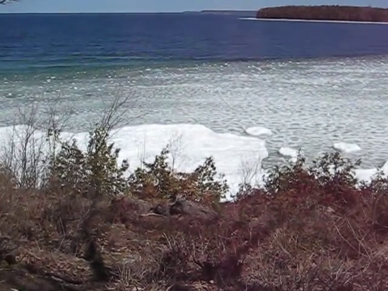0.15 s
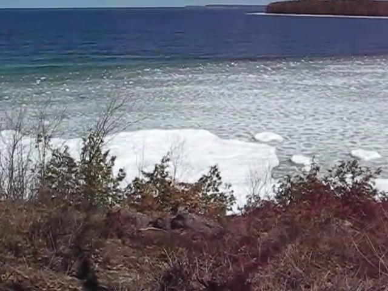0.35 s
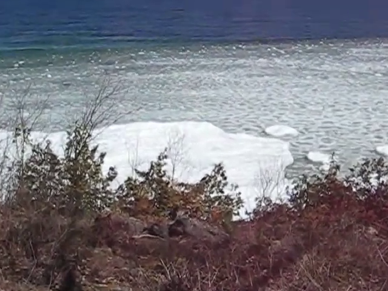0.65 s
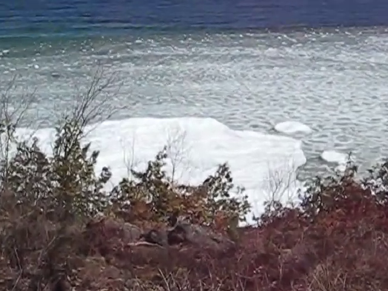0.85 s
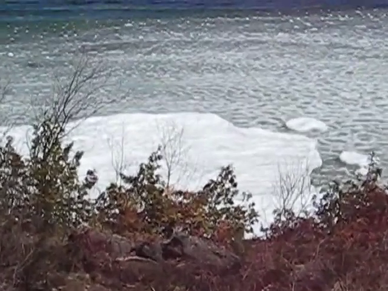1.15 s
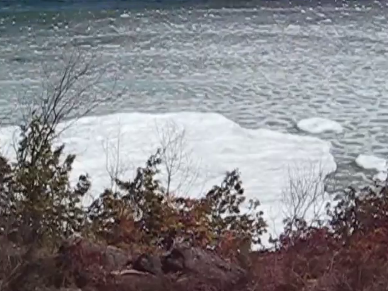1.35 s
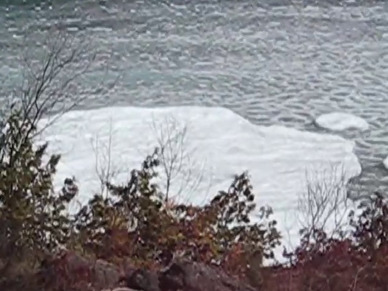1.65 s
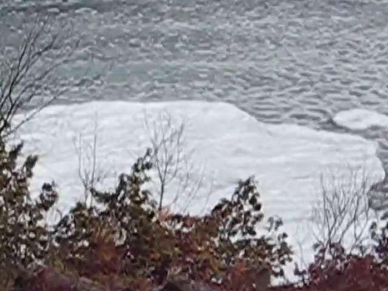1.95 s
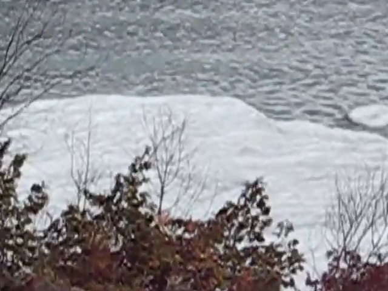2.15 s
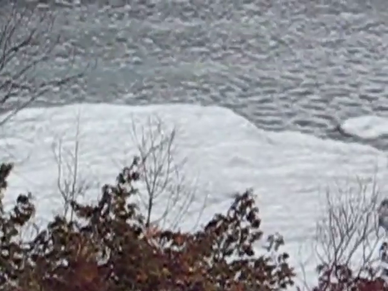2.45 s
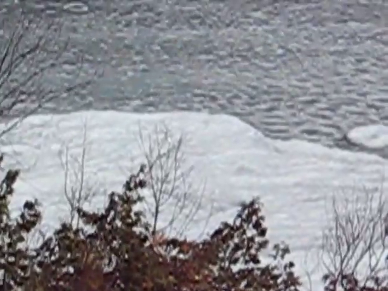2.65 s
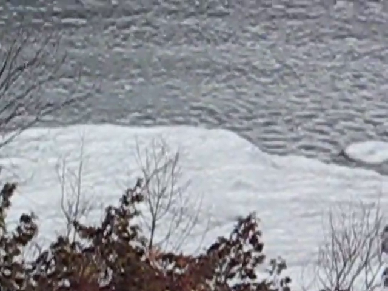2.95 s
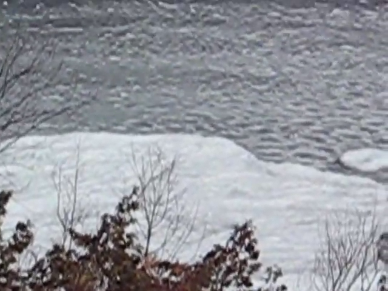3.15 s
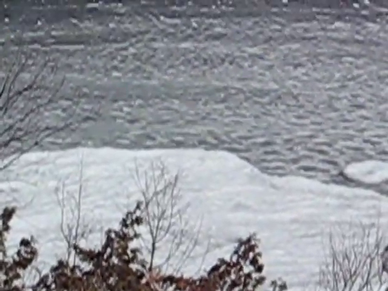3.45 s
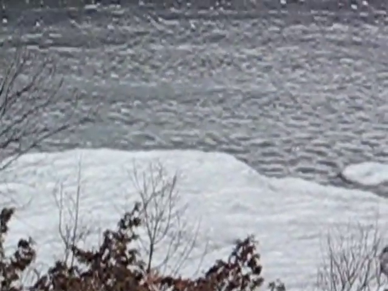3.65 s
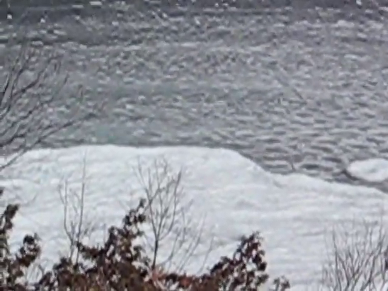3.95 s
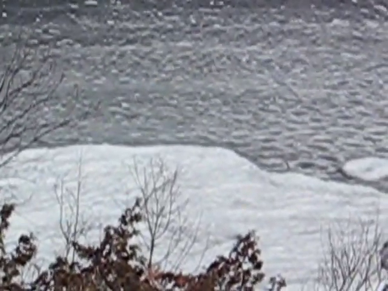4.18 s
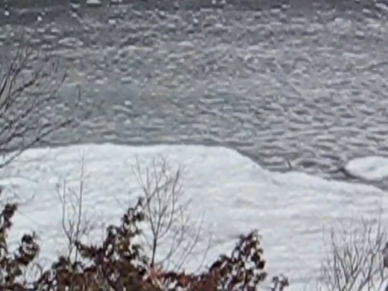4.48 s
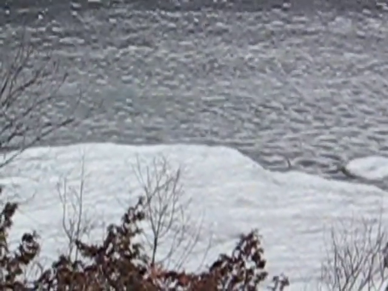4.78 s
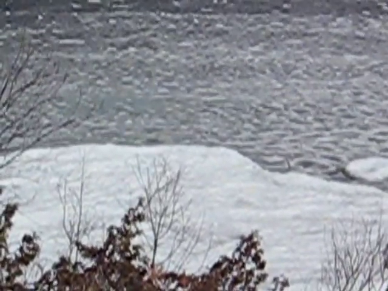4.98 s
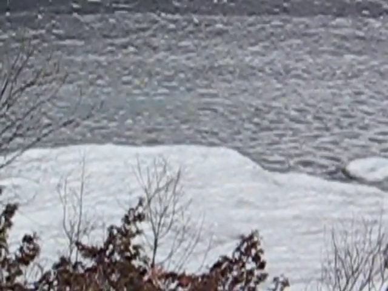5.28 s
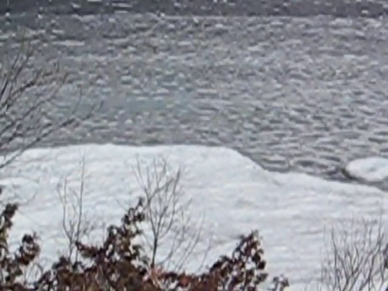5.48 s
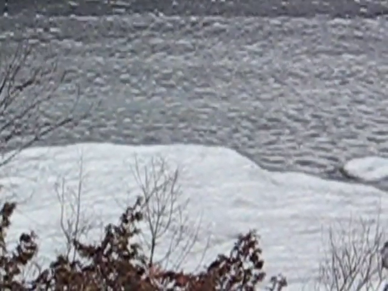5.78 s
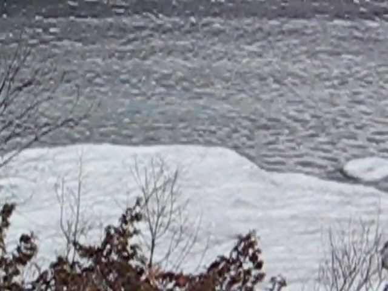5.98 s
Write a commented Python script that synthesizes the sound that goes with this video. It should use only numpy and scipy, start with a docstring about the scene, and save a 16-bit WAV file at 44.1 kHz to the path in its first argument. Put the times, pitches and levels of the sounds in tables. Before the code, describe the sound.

Lake water washes through slush and floating ice throughout the six seconds, heard from the bank above as a dense, bright, slightly fluttering hiss. Faint ticks of nearer ice pieces blend into it. A wave builds from the start, is fullest between about 1 and 1.8 seconds with a soft slosh and fizz, and drains away by about 3 seconds, leaving a calmer, steady wash.

Right at the microphone, the hand-held camera gives one short, sharp plastic click at about 1.9 seconds. A brief dull handling knock follows at 2.4 seconds, the strongest of the knocks, then two softer ones close together at around 3.1 seconds. Very faint puffs of air bump the microphone near 0.45 and 4.8 seconds, and a barely audible low air rumble rises around 4.2 seconds. The icy hiss continues to the end.

```python
"""A lake shore, heard from the bank above: water washes through slush and floating ice.
Countless small ice pieces merge into one hiss; a wave swells in it for two seconds and drains away,
while nearer bits tick against each other. Right at the microphone, light air rumbles and puffs,
and the hand-held camera knocks softly a few times and clicks once."""
import sys
import numpy as np
from scipy import signal
from scipy.io import wavfile
from scipy.ndimage import uniform_filter1d

SR = 44100
rng = np.random.default_rng(int(sys.argv[2]) if len(sys.argv) > 2 else 0)


def dump_mix(stems):
    """Bounce the given channels to the path in sys.argv[1] as a 16-bit WAV at rate SR."""
    frames = np.atleast_2d(stems).T  # one column per channel
    limited = np.clip(frames, -1, 1)  # hard clip at full scale
    pcm = np.round(limited * 32767).astype(np.int16)
    wavfile.write(sys.argv[1], SR, pcm)


N = 269892


def gain_of(db):
    """Decibels to gain."""
    return 10 ** (np.asarray(db) / 20)


def unit_rms(x):
    """Scales to rms 1."""
    return x / np.sqrt(np.mean(x ** 2) + 1e-20)


def unit_peak(x):
    """Scales to peak 1."""
    return x / (abs(x).max() + 1e-20)


def lowpass(x, hz, order=2):
    """Dulls a sound above hz."""
    return signal.sosfilt(signal.butter(order, hz, fs=SR, output="sos"), x)


def bump(distance):
    """A smooth hill of height 1 and half width 1."""
    return np.exp(-distance ** 2)


def curve_at(points, hz, column=1):
    """Reads one column of a spectrum on a log-frequency axis."""
    table = np.array(points, float)
    return np.interp(np.log(hz + 1), np.log(table[:, 0] + 1), table[:, column])


def add(mix, s, sound):
    """Adds a sound at time s."""
    part = mix[round(s * SR):][:len(sound)]
    part += sound[:len(part)]


def patches(shape, size):
    """Smooth random relief, size = (frames, bins) across."""
    smooth_in_time = uniform_filter1d(rng.standard_normal(shape), size[0], 0)
    return unit_rms(uniform_filter1d(smooth_in_time, size[1], 1))


def swell(t, crest_s, lift_db, build_s, drain_s, ebb_db_per_s, calm_s=5.5):
    """Level of one voice above calm water, in dB: the wave builds and drains over a slow ebb."""
    width_s = np.where(t < crest_s, build_s, drain_s)
    return lift_db * bump((t - crest_s) / width_s) + ebb_db_per_s * (calm_s - t)


# One wave below the bank, in three voices: crest t/s, lift/dB, build/s, drain/s, ebb/(dB/s)
WATER_SLOSH = (1.07, 6.74, 1.5, 1.14, 0.91)
SLUSH_RUSH = (1.7, 5.44, 1.26, 0.59, 0.83)
FINE_ICE_FIZZ = (1.26, 4.86, 0.83, 0.97, 0.5)
# How far each pitch follows those voices: f/Hz, slosh share, rush share, fizz share
VOICE_SHARES = [(333, 0.052, 0.056, 0), (525, 1, 0.028, 0), (1220, 0.93, 0.091, 0.11), (1950, 0.034, 1, 0),
                (3000, 0, 0.98, 0.067), (4620, 0.014, 0.099, 0.78), (6000, 0.03, 0, 0.96),
                (8160, 0, 0.046, 1.25), (9600, 0, 0, 0.64), (12500, 0, 0, 0.63), (15500, 0, 0, .25)]
# The hiss of the calm shore, from the bank: f/Hz, relative level/dB
CALM_SPECTRUM = [(20, -29), (60, -21.5), (130, -18.5), (250, -14), (400, -13.5), (650, -9.5), (920, -5.5),
                 (1350, -5), (2200, -0.5), (3500, 0), (6300, -4.5), (9300, -18), (12000, -21.5),
                 (15500, -32.5)]
# Wavelets breaking on the wave and in its wake: t/s, half length/s, lift/dB, f/Hz
BREAKING_WAVELETS = [(0.22, 0.09, 2, 1800), (0.58, 0.1, 1.5, 2000), (0.84, 0.1, 1, 6200),
                     (1.098, 0.16, 1.6, 2000), (1.35, 0.084, 1.7, 8000), (1.56, 0.07, 2, 7500),
                     (1.73, 0.074, 1.5, 2600), (2.2, 0.16, 1.0, 8000), (3.33, 0.3, 1.5, 900),
                     (3.42, 0.35, 0.6, 5500)]
# Broad resonances and hollows in the hiss: f/Hz, half width/Hz, calm level/dB, crest level/dB
HISS_RESONANCES = [(395, 43, -1.3, -3), (710, 85, -1, -0.2), (920, 69, 1, -0.2), (1420, 180, -0.3, 0),
                   (2090, 180, 1.5, 2), (2460, 310, -0.1, -0.5), (3120, 150, 0.5, 1.4),
                   (3600, 130, 0.5, -2), (4590, 290, 1, -1.2), (5760, 560, 0, 0.6)]


def shore_wash(level_db=-24.5, ripple_db=(0.4, 0.33, 0.2)):
    """Far off, ice grains too dense to tell apart merge into a hiss that the wave lifts."""
    t = np.arange(N // 256 + 5) * 256 / SR
    hz = np.fft.rfftfreq(1024, 1 / SR)
    shape = (len(t), len(hz))
    rise_db = np.transpose([swell(t, *voice) for voice in (WATER_SLOSH, SLUSH_RUSH, FINE_ICE_FIZZ)])
    ripples_db = np.array(ripple_db) * patches(rise_db.shape, size=(20, 1))
    shares = [curve_at(VOICE_SHARES, hz, column) for column in (1, 2, 3)]
    field_db = curve_at(CALM_SPECTRUM, hz) + (rise_db + ripples_db) @ shares
    for s, half_s, db, f in BREAKING_WAVELETS:
        octaves_away = np.log2((hz + 1) / f)
        field_db += db * np.outer(bump((t - s) / half_s), bump(octaves_away))
    # the colour shifts as the wave crests
    crest = unit_peak(rise_db.mean(1))[:, None]
    for f, width, calm_db, crest_db in HISS_RESONANCES:
        field_db += (calm_db + crest * (crest_db - calm_db)) * bump((hz - f) / width)
    field_db += 0.32 * patches(shape, size=(14, 16))  # clumps of slush shift on their own
    field_db += 0.58 * patches(shape, size=(10, 5)) / (1 + (hz / 2500) ** 2)  # low lapping
    field_db += 0.14 * patches((len(t), 1), size=(7, 1))  # the whole hiss flutters
    noise = rng.standard_normal(shape) + 1j * rng.standard_normal(shape)
    hiss = signal.istft((noise * gain_of(field_db)).T, nperseg=1024, noverlap=768)[1][:N]
    return gain_of(level_db) * unit_rms(hiss)


def ice_ticks(calm_db=-47.0, per_s=700, spread_db=6.0, cycles=7, pitches=24):
    """Nearer the microphone, bits of ice tick against each other, louder as the slush rushes."""
    t, out = np.arange(900) / SR, np.zeros(N)
    strength = gain_of(spread_db * np.minimum(rng.exponential(1, N), 4))
    impacts = strength * (rng.random(N) < per_s / SR)
    piece = rng.integers(0, pitches, N)
    for k, hz in enumerate(np.geomspace(1500, 6500, pitches)):
        age = t * hz / cycles
        tick = age * np.exp(-3 * age) * np.sin(2 * np.pi * hz * t)
        out += signal.oaconvolve(impacts * (piece == k), tick)[:N]
    return gain_of(calm_db + swell(np.arange(N) / SR, *SLUSH_RUSH)) * unit_rms(out)


# Light gusts across the microphone: t/s, half length/s, lift/dB
MIC_GUSTS = [(3.6, 0.35, 5), (4.22, 0.22, 10), (4.87, 0.07, 8)]


def air_rumble(steady_db=-69, cutoff_hz=50):
    """Air moving over the microphone makes a faint rumble that rises with each gust."""
    t = np.arange(N) / SR
    gust_db = sum(db * bump((t - s) / half_s) for s, half_s, db in MIC_GUSTS)
    rumble = unit_rms(lowpass(rng.standard_normal(N), cutoff_hz))
    return gain_of(steady_db + gust_db) * rumble


# The hand on the camera, right at the microphone: t/s, peak level/dB, low-pass f/Hz
HAND_KNOCKS = [(0.3533, -30, 420), (1.8905, -32, 350), (1.9254, -22.5, 553), (2.3728, -9, 900),
               (3.0549, -14, 730), (3.1384, -23, 620)]
# Modes of the camera's case: f/Hz, relative level/dB, time to fall 60 dB/s
CASE_MODES = [(267, -8, 0.019), (420, 1.5, 0.016), (552, -5.5, 0.034), (760, 4.5, 0.024), (900, -5, .024),
              (1130, 9, 0.037)]


def handling_knocks(low_cut_hz=190):
    """Soft pushes of the hand ring the camera's case briefly; the softer the push, the duller."""
    t, out = np.arange(3000) / SR, np.zeros(N)
    ring = sum(gain_of(db - 60 * t / t60) * np.cos(2 * np.pi * hz * t) for hz, db, t60 in CASE_MODES)
    ring = signal.sosfilt(signal.butter(2, low_cut_hz, "high", fs=SR, output="sos"), ring)
    for s, db, soft_hz in HAND_KNOCKS:
        add(out, s, -gain_of(db) * unit_peak(lowpass(ring, soft_hz, order=6)))
    return out


# Puffs of air straight onto the microphone: t/s, peak level/dB, rise/s
MIC_PUFFS = [(.434, -40, .0014), (0.4422, -35, 0.00082), (0.465, -32, 0.00077), (4.8277, -33, 0.0015),
             (4.864, -42, 0.0016)]


def air_puffs():
    """Each puff bumps the microphone with one dull dip of pressure and a slow rebound."""
    t, out = np.arange(3000) / SR, np.zeros(N)
    for s, db, rise_s in MIC_PUFFS:
        age = t / rise_s
        pressure = -age ** 2 * (3 - age) * np.exp(-age)
        add(out, s, gain_of(db) * unit_peak(pressure))
    return out


# A small control on the camera, close to the microphone: t/s, ring's peak level/dB, f/Hz
CONTROL_SNAPS = [(1.9264, -11.5, 1130)]


def control_click(rise_s=0.0013, tick_db=-12, tick_decay_s=0.0005, lead_s=0.00081):
    """The control snaps: a sharp tick, then a short plastic ring with one upper mode."""
    t, out = np.arange(1200) / SR, np.zeros(N)
    for s, db, hz in CONTROL_SNAPS:
        tick = rng.standard_normal(len(t)) * np.exp(-t / tick_decay_s)
        modes = np.sin(2 * np.pi * hz * t) + gain_of(-6) * np.sin(2 * np.pi * 1.25 * hz * t)
        ring = t * np.exp(-t / rise_s) * modes
        add(out, s - lead_s, gain_of(db + tick_db) * unit_peak(tick))
        add(out, s, gain_of(db) * unit_peak(ring))
    return out


def scene():
    """The shore below, with air and handling at the microphone, alike in both channels."""
    mono = shore_wash() + ice_ticks() + air_rumble() + handling_knocks() + air_puffs() + control_click()
    return np.array([mono, mono])


def record(dry, edge_hz=15730):
    """The recorder's band limit cuts off the highest treble."""
    band_limit = signal.firwin(1023, edge_hz, window=("kaiser", 9), fs=SR)
    return signal.oaconvolve(dry, band_limit[None], "same")


dry = scene()
out = record(dry)
dump_mix(out)
```